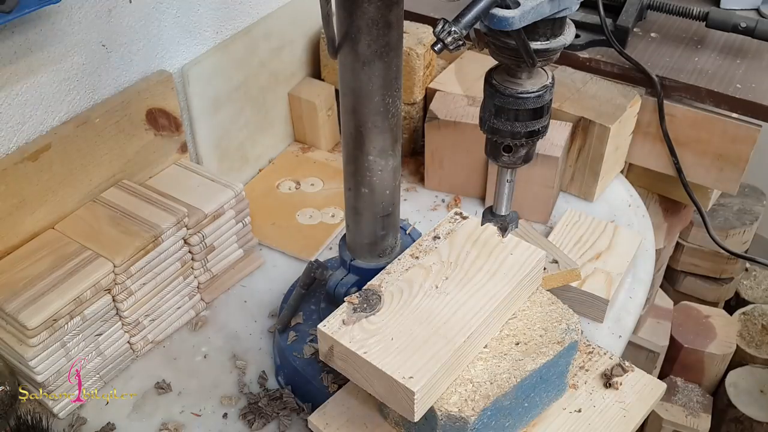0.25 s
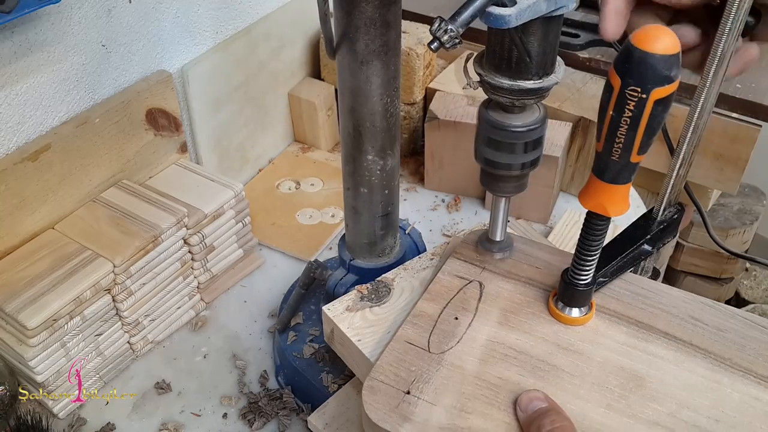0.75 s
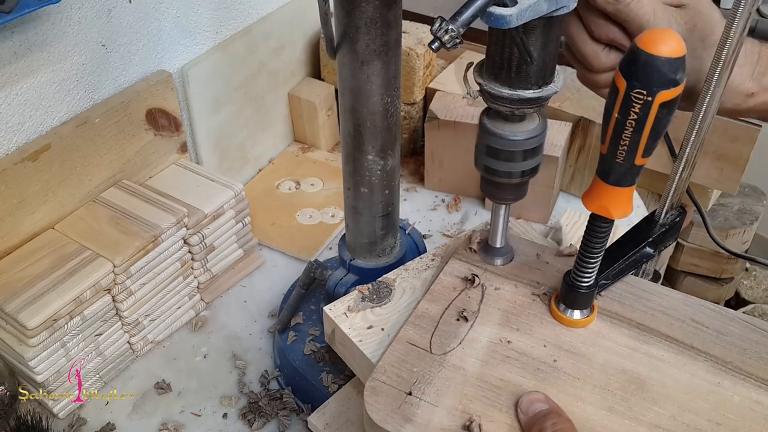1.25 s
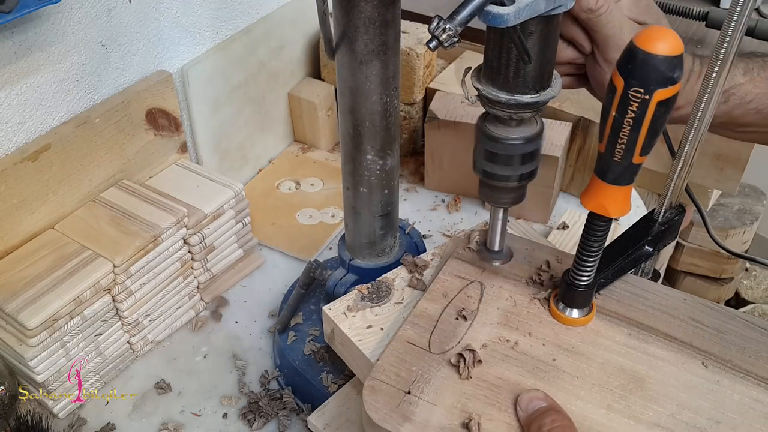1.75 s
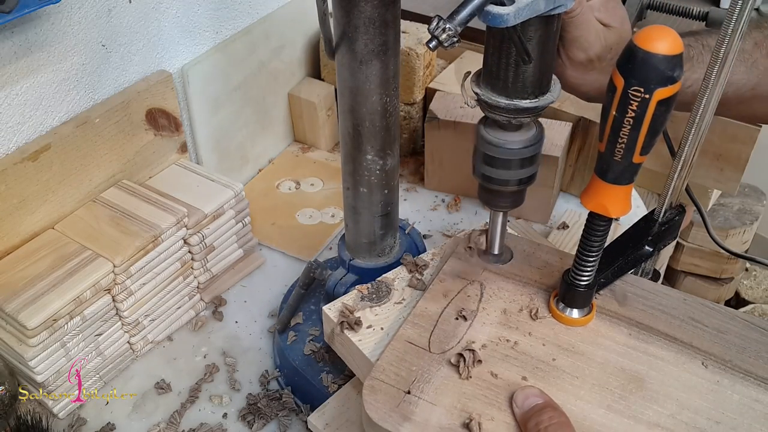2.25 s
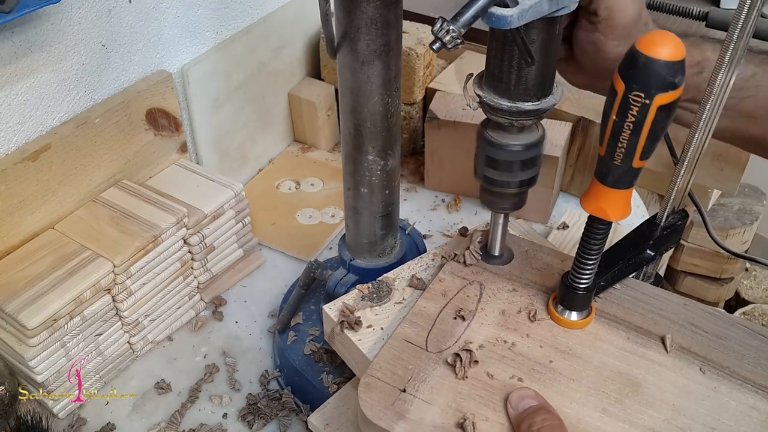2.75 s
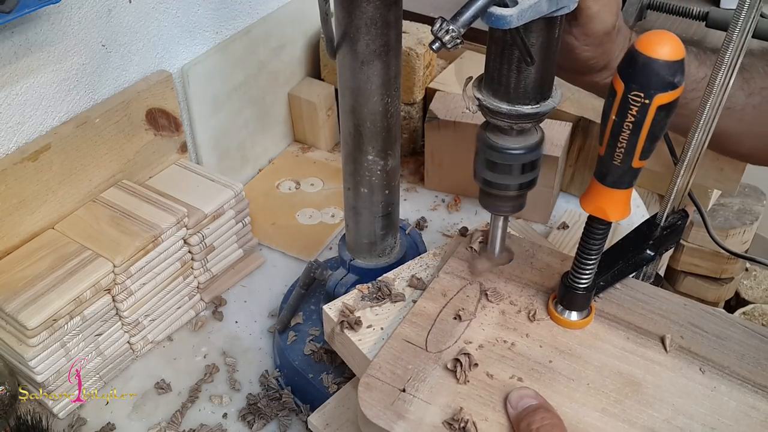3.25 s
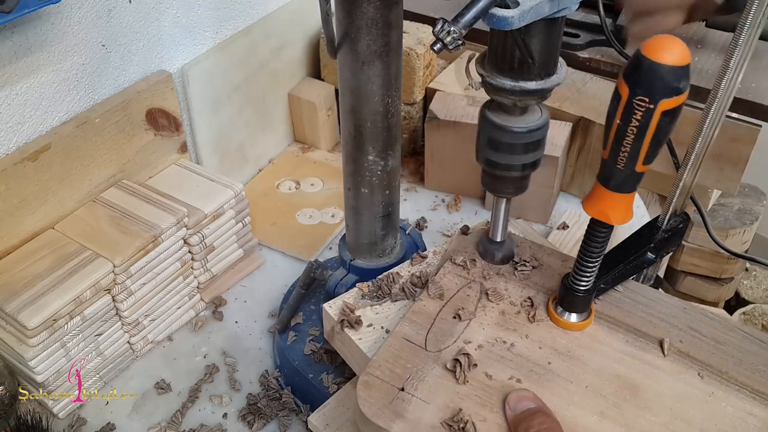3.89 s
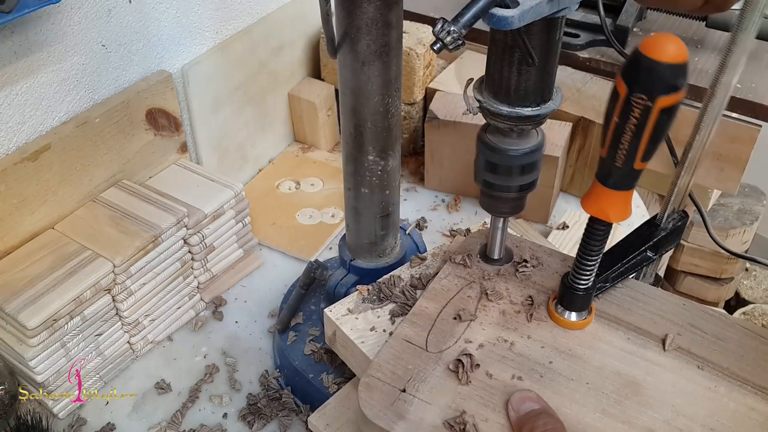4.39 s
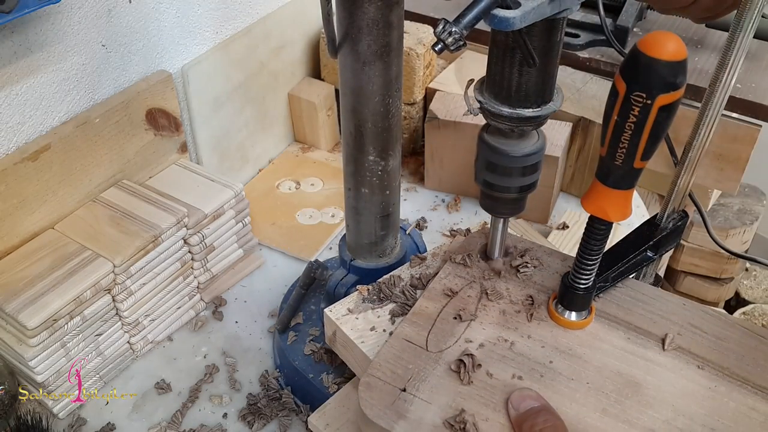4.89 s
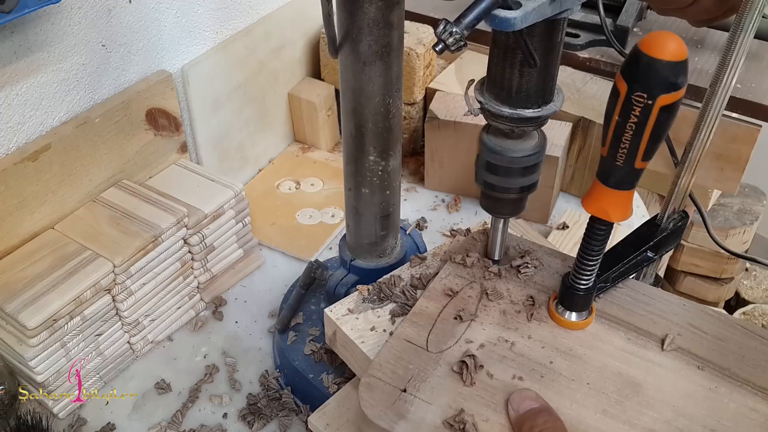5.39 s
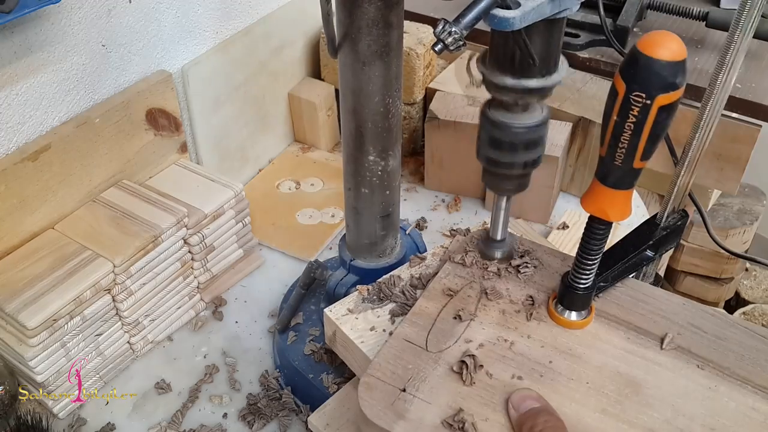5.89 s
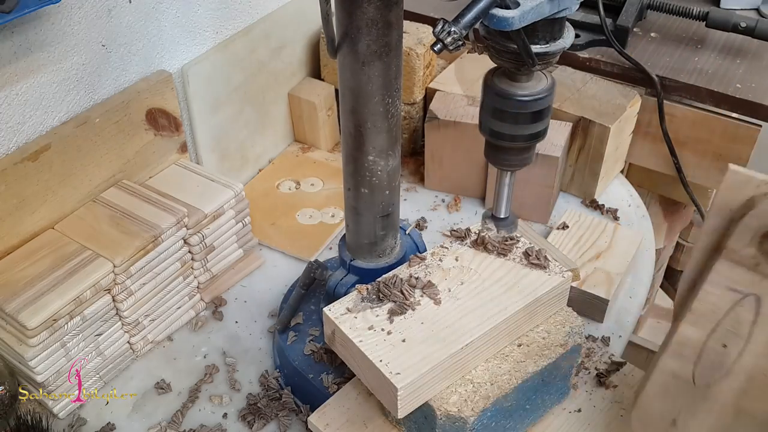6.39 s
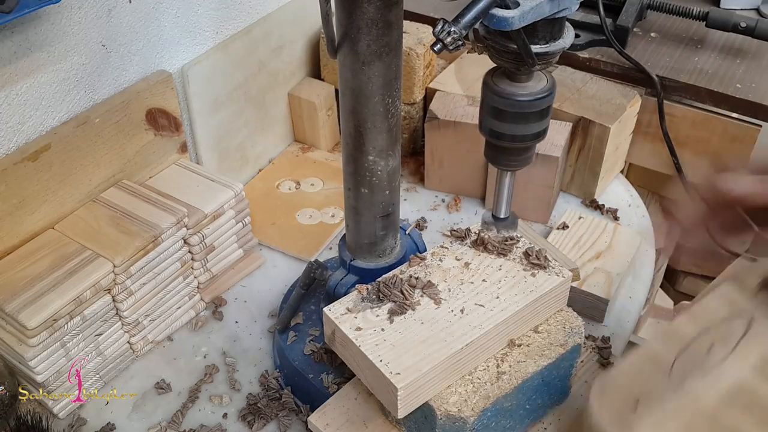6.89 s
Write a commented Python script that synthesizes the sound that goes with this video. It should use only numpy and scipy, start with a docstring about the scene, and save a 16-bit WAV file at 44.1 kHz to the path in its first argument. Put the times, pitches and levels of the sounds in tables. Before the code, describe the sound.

Faint brushes of wood on wood open the scene in a small, quiet workshop. At about 0.7 seconds a bench drill press starts abruptly, its whirr, motor hum and thin bearing whine continuing close by throughout. From 1 to 2.5 seconds the bit bores into a hardwood board with a fast, fluttering rasp, hissing chips and brief high squeals. It rubs and squeaks in the hole, then cuts again from 2.8 to 3.8 seconds, squealing a few more times. Around 4 seconds it scrapes and snags in several sharp catches. A third, deeper plunge runs from 4.4 to 5.9 seconds with a rougher judder, ending in tiny squeaks and a rub. From 6 seconds shavings tick onto the table, and the board slides off with a short scrape near 6.4 seconds. The idling spindle knocks lightly and unevenly until the end, just after 7 seconds.

```python
"""A bench drill press bores a hardwood board in three plunges with a two-lipped bit, in a small workshop.
After faint handling the machine cuts in: bearings whirr through the cast frame and whine, the motor
hums, the idling spindle knocks. Each lip rasps across the grain once a turn, tearing chips, jolting the
board and ringing the bit, at times to a squeal. Between plunges the bit rubs, catches and squeaks in
the hole. At the end the board is slid off and shavings scatter."""
import sys
import numpy as np
from scipy import signal
from scipy.fft import rfft, irfft, next_fast_len
from scipy.io import wavfile
from scipy.ndimage import uniform_filter1d

SR = 44100
rng = np.random.default_rng(int(sys.argv[2]) if len(sys.argv) > 2 else 0)


def generate_wav(signal):
    """Clip the signal to [-1, 1] and save it as 16-bit WAV at the path in sys.argv[1]."""
    frames = np.transpose(np.atleast_2d(signal))
    scaled = np.clip(frames, -1, 1) * 32767
    pcm = np.round(scaled).astype(np.int16)
    wavfile.write(sys.argv[1], SR, pcm)


N = 314874
T = np.arange(N) / SR
FFT_SIZE = next_fast_len(N + SR // 2)
HZ = np.fft.rfftfreq(FFT_SIZE, 1 / SR)

MOTOR_ON_S, FREE_TURNS_PER_S = 0.7122, 41.5
JOLT_LAG_RAD = 1.15  # spindle angle from a lip's bite to the board's jolt
FREE, BORING, DEEP = 0, 1, 2  # press state: running free, boring, deep in the hole

# Levels are relative within each table.
# wood slid on the table: (time [s], length [s], level [dB], brightness [0-1])
SLIDES = [(0.104, .03, -68.5, 0.3), (0.234, 0.014, -64.5, 0.77), (0.27, .014, -71, 0.3),
          (0.33, 0.095, -71.5, 0.1), (0.439, 0.0084, -60, 0.95), (0.46, 0.021, -61, 0.93),
          (0.508, 0.11, -74, 0.3), (6.406, 0.063, -36.5, 0.88)]
# spectrum of a sliding edge: (frequency [Hz], level [dB])
EDGE_SPECTRUM = [(200, -46), (400, -9), (800, -24), (2000, -10), (6000, -1), (12200, -8), (15500, -3.5)]
# still room: (frequency [Hz], level [dB])
ROOM_SPECTRUM = [(15, -20), (25, 4), (35, -25), (55, -40), (99, -46), (368, -11), (722, -21), (804, -9),
                 (1300, -21), (1800, -18), (2060, -20), (12500, -28), (15500, -40)]
# resonances of frame, table, board and bit:
# (frequency [Hz], width [Hz], free lift [dB], boring lift [dB], deep lift [dB])
PRESS_MODES = [(396, 50, 3.5, 8, -5.5), (538, 69, 8, 7, 7.5), (625, 35, 15.5, 5.5, -2),
               (734.4, 41, 10.5, 5.5, 7), (829, 85, 15, 1.5, 5), (1030, 33, 5.5, 4, 1.5),
               (1237, 40, 7, -3.5, 5.5), (1442.4, 71.5, 17, 13, 9.5), (1537, 85, 13, 4.5, 8.5),
               (1707.4, 101, 18, 10.5, 12), (1790.6, 38, 15.5, 14, 14), (1887, 50, -0.5, -6, -4),
               (1900, 43, 1.5, 5.5, 2.5), (1987, 85, 10, 7, 7.5), (2156, 130, 0, 6.5, 9.5),
               (2280, 93, 5, 10, 10), (2492, 58, 8, 11.5, 9), (2600, 35, 8, 4, 9.5),
               (2722, 140, 2.5, 12, 13), (2960, 41, 4.5, -1.5, 11.5), (3025, 190, -2.5, 1.5, -8.5),
               (3460, 320, -5.5, 1.5, 3.5), (3630, 73, 9.5, 7, 5.5), (3680, 41, 8.5, 7, 2.5),
               (4134, 116, 11, 7.5, 13.5), (4280, 17, 12.5, 4, 11), (4415, 106, 10, 14, 15.5),
               (5100, 370, -5, 2.5, 1.5), (5640, 260, 11.5, 4.5, 6.5), (6750, 270, 10, 7, 1.5),
               (7500, 250, 6, 1.5, -3), (9000, 190, -8, 8.5, 1.5), (11200, 750, -8, 4, 3)]
# force exciting them: (frequency [Hz], free level [dB], boring level [dB], deep level [dB])
FORCE_SPECTRUM = [(29.6, -10, -17.5, -19), (128, -31.5, -18.5, -26), (206, -13, -17, -19.5),
                  (465, -9.5, -19.5, -17.5), (1180, -3, -3.5, -8), (1600, -5, 1, -1.5),
                  (2370, 2, -6.5, -5.5), (3090, 2, -2, -1), (4340, -0.5, 0, -5.5), (4660, -4, 3.5, 2.5),
                  (7900, -12, 5.5, 3), (10350, -1.5, 6.5, 2.5), (12100, -7, 8, -1), (15600, -7.5, 6.5, 4.5)]
# motor tones: (low [Hz], middle [Hz], high [Hz])
HUM_HZ = (400, 732, 832)
# their swell and fade: (time [s], low tone [dB], middle tone [dB], high tone [dB])
HUM_LEVELS = [(.75, -58.5, -65, -56), (1.3, -68, -62, -61), (1.95, -67, -57, -55), (2.3, -67, -60, -61),
              (2.65, -63, -54, -53), (3.35, -66, -62, -62), (3.95, -71, -49, -48), (4.25, -73, -57, -53),
              (4.45, -74, -57, -50), (4.8, -78, -55, -56), (5.15, -78, -48, -50), (5.6, -76, -55, -58),
              (6.05, -65, -55, -53), (6.4, -63.5, -60, -58), (7.1, -65, -64, -58)]
# bearing tones: (frequency [Hz], start level [dB], midway level [dB], end level [dB])
WHINE_LINES = [(1696, -55, -52, -49), (1997, -53, -55, -56), (2326, -58, -58, -58), (2550, -60, -58, -56),
               (2585, -50, -46.5, -43), (2842, -61, -59, -58), (3358, -47, -53, -54), (3382, -60, -61, -61),
               (3694, -56, -56, -58), (3880, -64, -62, -59), (4140, -48, -43, -44), (7370, -72, -65, -61)]
# spindle knocks: (time [s], frame ring [dB], steel tick [dB])
KNOCKS = [(0.829, -25, -38), (2.567, -25, -51), (2.635, -29, -41), (6.165, -30, -45), (6.2187, -35, -46),
          (6.2594, -35, -48), (6.3116, -29, -44), (6.3338, -29.5, -39), (6.408, -35, -40),
          (6.5665, -36, -42), (6.6004, -35, -34), (6.6387, -34, -50), (6.74, -31, -44), (6.7845, -32, -40),
          (6.8396, -27, -48), (6.8714, -35.5, -45), (6.948, -29.5, -42), (7.016, -30, -49),
          (7.0714, -36, -42)]
# bit fed into the board: (start [s], end [s], feed-in [s], spindle slowing [turns/s], board level [dB],
# board drift [dB/s], chip hiss [dB], bit ring [dB], ring end [s])
PLUNGES = [(0.973, 2.52, 0.022, 2.43, -28, -1, -29, -35.5, 2.45),
           (2.775, 3.836, 0.062, 1.86, -29.5, -1.5, -29, -38.5, 3.59),
           (4.439, 5.898, 0.09, 0.912, -28, 0.5, -30.5, -43, 5.8)]
# one lip takes over in the deep hole: (time [s], imbalance [0-1])
LIP_IMBALANCE = [(4.8, .05), (5.3, .35)]
# passing resonances of the cut: (peak time [s], length [s], frequency [Hz], width [Hz], lift [dB])
CUT_SWELLS = [(1.146, 0.27, 1520, 150, 4), (1.142, 0.26, 2110, 500, 5), (1.5, 3, 6960, 600, 1.5),
              (1.496, 1.3, 12000, 800, 0.5), (1.86, 0.37, 1776, 80, 11.5), (3.3, 1, 10000, 1100, 5.5),
              (3.3, 1.2, 1470, 160, -2), (4.656, .6, 10000, 1400, 6), (4.755, 0.84, 2560, 250, 8.5),
              (5.35, 1.23, 9100, 1700, 2.5), (5.45, 0.59, 2270, 260, 4.5), (5.447, 0.83, 2920, 171, 7.5),
              (5.503, 0.99, 3580, 149, 9.5), (5.6, 1.2, 1270, 150, 9.5)]
# a lip snags the hole wall: (time [s], length [s], level [dB])
CATCHES = [(.976, .003, -29.5), (2.635, .004, -37), (2.731, .008, -27.5), (3.875, .035, -39),
           (3.949, .008, -28.5), (3.963, .012, -28), (4.022, .013, -27.5), (4.115, .01, -26.5),
           (4.199, .005, -31), (4.209, .024, -25), (4.236, .018, -36), (4.388, .008, -36),
           (5.972, .019, -32), (6.012, .02, -40)]
# bit squeals: (peak time [s], length [s], level [dB])
SQUEALS = [(1.016, 0.015, -31), (1.24, .05, -35.5), (1.448, 0.057, -36), (1.514, 0.052, -33),
           (1.607, 0.081, -30), (1.687, 0.049, -31.5), (2.094, 0.038, -29), (2.192, 0.1, -32.5),
           (2.264, 0.056, -40), (2.378, 0.12, -32), (2.903, 0.1, -30.5), (3.04, 0.055, -34),
           (3.105, .04, -44), (3.193, .06, -33), (3.35, 0.037, -38)]
# rim rubs while lifted: (start [s], end [s], level [dB])
RUBS = [(2.48, 2.76, -39), (3.799, 4.33, -40), (4.297, 4.464, -35.5), (5.862, 6.061, -37.5)]
# rubbed board: (frequency [Hz], level [dB])
RUB_SPECTRUM = [(59, -27), (100, -29.5), (447, -17.5), (627, -3.5), (1160, -7), (1450, 6), (1730, 2),
                (2000, -3.5), (2630, 1.5), (3050, -12), (4280, -2), (4860, -6.5), (5750, -6.5),
                (15500, -19)]
# dry steel on wood: (time [s], frequency [Hz], length [s], level [dB])
SQUEAKS = [(2.502, 11200, .007, -33), (2.75, 11400, .006, -22.5), (2.751, 7700, .004, -35),
           (2.757, 11600, .014, -35), (2.774, 11600, .005, -30), (4.421, 10100, .008, -27),
           (4.424, 9000, .016, -35), (4.434, 10200, .014, -36), (5.838, 8800, .0032, -28),
           (5.863, 8800, .0037, -26)]
# shavings land: (time [s], frequency [Hz], level [dB])
SHAVINGS = [(6.067, 10800, -42), (6.118, 10830, -44), (6.151, 6100, -39), (6.165, 11000, -43),
            (6.222, 5500, -54), (6.321, 7000, -44), (6.404, 11000, -50), (6.42, 6200, -44),
            (6.6, 6940, -43), (6.693, 10000, -40.5), (6.824, 9400, -42), (7.012, 9500, -41),
            (7.13, 10400, -42)]
# stereo width by default, boring and deep in the hole: (frequency [Hz], side minus mid [dB])
BASE_WIDTH = [(60, -11), (99, -17), (160, -7), (270, -33), (450, -14), (740, -18), (1220, -8), (1600, -23),
              (2010, -1), (3330, -7.5), (5500, 0.5), (9080, -12.5), (15000, -12)]
BORING_WIDTH = [(60, 1), (99, -11), (160, -1), (270, -3), (450, -7), (740, -20), (1200, -9.5),
                (1500, -18.5), (1780, -19), (2100, -8.5), (3330, -2.5), (4350, -5.5), (5500, -0.5),
                (9080, -8), (15000, -2.5)]
DEEP_WIDTH = [(60, 16), (99, -17), (160, -1), (270, -11), (450, -7), (740, -31), (1250, -10.5), (1650, -22),
              (2010, -5.5), (3330, -3), (5500, 2), (9080, -14), (15000, -16)]
# stereo balance: (frequency [Hz], left minus right [dB])
BALANCE = [(60, 1), (99, -3), (160, 2.5), (270, -1.5), (450, 1.5), (740, 1), (1220, 1), (2010, -1.5),
           (3330, 0.5), (5500, -0.5), (9080, -0.5), (15000, -0.5)]


def amp(db):
    """Decibels to gain."""
    return 10 ** (np.asarray(db) / 20)


def unit_rms(x):
    """Divide by the root of the mean square: rms 1 for real x."""
    return x / np.sqrt(np.mean(x ** 2) + 1e-20)


def curve(points):
    """(Hz, value) points joined on a log frequency axis."""
    hz, value = np.transpose(points)
    return np.interp(np.log(HZ + 1), np.log(hz + 1), value)


def bell(hz, width_hz):
    """Power curve of one resonance."""
    return 1 / (1 + (2 * (HZ - hz) / width_hz) ** 2)


def gate(start_s, end_s, rise_s, fall_s):
    """Trapezoid envelope, zero at start and end."""
    return np.clip(np.minimum((T - start_s) / rise_s, (end_s - T) / fall_s), 0, 1)


def burst(start_s, length_s, rise_s, fall_s):
    """Linear rise, hold, exponential fall."""
    return np.clip((T - start_s) / rise_s, 0, 1) * np.exp(-np.clip((T - start_s - length_s) / fall_s, 0, 20))


def wobble(rate_hz):
    """Smooth random curve, rms near 1."""
    knots = signal.resample_poly(rng.standard_normal(int(N * rate_hz / SR) + 4), 4, 1)
    return np.interp(T * rate_hz, np.arange(len(knots)) / 4, knots)


def roughness(rate_hz, spread_db):
    """Random, bounded flutter of a contact force, rms 1."""
    return unit_rms(amp(spread_db * 2 * np.tanh(wobble(rate_hz) / 2)))


def turn_pulses(angle, depth_db, uneven_db):
    """Two unequal pulses a turn, skewed like a lip's quick bite and slow release; rms 1."""
    bite = np.cos(2 * angle) - 0.3 * np.sin(4 * angle)
    return unit_rms(amp(depth_db * bite + uneven_db * np.cos(angle)))


def filtered(x, response):
    """Apply a frequency response."""
    return irfft(rfft(x, FFT_SIZE) * response, FFT_SIZE)[..., :N]


def causal(gain_db):
    """Minimum-phase response: rings only after it is struck."""
    cepstrum = irfft(np.maximum(gain_db, -120) * np.log(10) / 20, FFT_SIZE)
    cepstrum[1:FFT_SIZE // 2] *= 2
    cepstrum[FFT_SIZE // 2 + 1:] = 0
    return np.exp(rfft(cepstrum))


def noise(envelope, response, width=BASE_WIDTH):
    """Enveloped stereo noise, coloured by a response."""
    spread = np.arctan(amp(curve(width)))
    drive = envelope * rng.standard_normal((2, N))
    mid, side = filtered(drive, unit_rms(response) * [np.cos(spread), np.sin(spread)])
    return np.array([mid + side, mid - side])


def room_tone():
    """Faint, near-steady noise of the still room."""
    return noise(amp(-79 + 0.3 * wobble(2.6)), amp(curve(ROOM_SPECTRUM)))


def handling():
    """Wood brushes wood: bright on an edge, dull when flat."""
    edge = flat = 0
    for s, length_s, db, brightness in SLIDES:
        stroke = amp(db) * burst(s, length_s, rise_s=length_s / 3, fall_s=0.013)
        edge += stroke * np.sqrt(brightness)
        flat += stroke * np.sqrt(1 - brightness)
    flat_db = curve([(150, -33), (400, 0), (1200, 0.5), (3000, -6), (15000, -8.5)]) + 7 * bell(1160, 160)
    return noise(edge, causal(curve(EDGE_SPECTRUM))) + noise(flat, causal(flat_db))


def spindle():
    """Angle [rad] and load [0-1]; each plunge drags the speed down."""
    lag_s = 0.14
    load = lost_turns_per_s = 0
    for start_s, end_s, _, slowing, *_ in PLUNGES:
        engaged = gate(start_s, end_s + lag_s / 2, lag_s, lag_s)
        load += engaged
        lost_turns_per_s += slowing * engaged
    return 2 * np.pi * np.cumsum(FREE_TURNS_PER_S - lost_turns_per_s) / SR, load


def press_response(state):
    """Force spectrum lifted by the resonances of the press in one state."""
    force_db = curve([(hz, db[state]) for hz, *db in FORCE_SPECTRUM])
    modes_db = sum(db[state] * bell(hz, width_hz) for hz, width_hz, *db in PRESS_MODES)
    return causal(force_db + modes_db)


def whirr(angle, running):
    """Rattling bearings ring the cast frame."""
    rattle = roughness(560, spread_db=0.5) * turn_pulses(angle, depth_db=1, uneven_db=-1)
    return noise(amp(-42 + 0.7 * wobble(14)) * running * rattle, press_response(FREE))


def hum():
    """Three low motor tones swell and fade."""
    times_s, *levels_db = np.transpose(HUM_LEVELS)
    tones = sum(amp(np.interp(T, times_s, db)) * np.sin(2 * np.pi * hz * T + 0.15 * wobble(12))
                for hz, db in zip(HUM_HZ, levels_db))
    return np.sqrt(2) * tones


def whine(load):
    """Bearing tones swell on each belt lap, waver and sink under load; the high ones most."""
    laps_per_s, tight_s, midway_s = 3.8, 6.53, 4.4
    belt_pull = np.cos(2 * np.pi * laps_per_s * (T - tight_s))
    lines = np.zeros((2, N))
    for hz, *drift_db in WHINE_LINES:
        height = min(hz / 3000, 1)
        phase = 2 * np.pi * hz * T + height * (0.15 + 1.1 * load) * wobble(24)
        swell_db = 4.5 * min(hz / 4000, 1) ** 3 * belt_pull + 0.7 * wobble(7.8)
        level_db = np.interp(T, [MOTOR_ON_S, midway_s, T[-1]], drift_db) + swell_db - 11 * height * load
        stereo_rad = [[0], [min(hz / 2400, 1.5)]]
        lines += amp(level_db) * np.sin(phase + stereo_rad)
    return amp(3) * lines


def knocks():
    """The loose, unloaded spindle knocks in its splines: frame rings, steel ticks."""
    thump = sum(amp(db) * burst(s, 0.0012, rise_s=0.00056, fall_s=0.0064) for s, db, _ in KNOCKS)
    tick = sum(amp(db) * burst(s, 0.0011, rise_s=0.0015, fall_s=0.0041) for s, _, db in KNOCKS)
    impact_db = curve([(400, -10.5), (800, -1.5), (1700, -0.5), (3000, -11), (8000, -8)])
    frame = press_response(FREE) * causal(impact_db)
    steel = bell(5500, 320) + 0.27 * bell(7200, 300)
    return noise(amp(-10.5) * thump, frame) + noise(amp(1) * tick, steel)


def feed(plunge):
    """Board, hiss and ring envelopes of one plunge: build on feeding, die on lifting."""
    start_s, end_s, feed_in_s, _, board_db, drift_db_per_s, hiss_db, ring_db, ring_end_s = plunge
    lift_s = 0.073
    elapsed_s = np.clip(T - start_s, 0, end_s - start_s)
    board = gate(start_s, end_s, feed_in_s, lift_s) * amp(board_db + drift_db_per_s * elapsed_s)
    hiss = gate(start_s, end_s, 0.021, lift_s) * amp(hiss_db)
    ring = gate(start_s, ring_end_s, feed_in_s, lift_s) * amp(ring_db + 0.8 * wobble(11))
    return np.array([board, hiss, ring])


def chips(per_s=1800, low_hz=5000, high_hz=15500, fall_s=0.0007):
    """Chips snap off as tiny pings of random pitch and size; stereo, rms 1."""
    when, pitch, offset, side, size = rng.random((int(per_s * N / SR), 5)).T[:, :, None]
    t = T[:SR // 250]
    phase = 2 * np.pi * ((low_hz + pitch * (high_hz - low_hz)) * t + offset)
    decay = amp(-3.2 * np.log(size + 0.03)) * np.exp(-t / fall_s)
    samples = ((when * N).astype(int) + np.arange(len(t))).ravel()
    left_right = [decay * np.sin(phase + ear * np.pi * (side - 0.5)) for ear in (0.5, -0.5)]
    return unit_rms(np.array([np.bincount(samples, pings.ravel(), N)[:N] for pings in left_right]))


def bore(plunges, angle, response, width, board_db, hiss_db, ring_db, jolt_gain, imbalance, pan_db):
    """The lips tear hissing chips, jolt the board and ring the bit."""
    board, hiss, ring = sum(feed(plunge) for plunge in plunges)
    treble = 1 / (1 + (4200 / (HZ + 1)) ** 6)
    bit_mode = bell(4264, 280) ** 2
    board_band = response * np.sqrt((1 - treble) * (1 - bit_mode))
    chip_band = response * np.sqrt(treble * (1 - bit_mode))
    tearing = turn_pulses(angle, depth_db=2.3, uneven_db=-0.7) * roughness(1900, spread_db=3.4)
    snaps = chips() * turn_pulses(angle, depth_db=2.5, uneven_db=-0.7)
    # just after biting, each lip breaks through the end grain
    lagged = angle - JOLT_LAG_RAD
    breakthrough = np.exp(1.8 * (np.cos(2 * lagged) - 1))
    jolt = 1 + jolt_gain * (1 + imbalance * np.cos(lagged)) * breakthrough
    thrust = unit_rms(jolt) * roughness(1100, spread_db=0.8) * amp(0.3 * wobble(22))
    chatter = turn_pulses(lagged, depth_db=2.2, uneven_db=0.5) * amp(0.39 * wobble(25.5))
    cut = (noise(amp(board_db) * board * thrust, board_band, width)
           + noise(amp(hiss_db) * hiss * tearing, chip_band, width)
           + filtered(amp(hiss_db - 2.5) * hiss * snaps, unit_rms(chip_band))
           + noise(amp(ring_db) * ring * chatter, response * np.sqrt(bit_mode), width))
    return cut * amp([[pan_db / 2], [-pan_db / 2]])


def depth_and_grain(cut):
    """The cut's colour shifts with depth, and at random with the grain."""
    hz, t, spectra = signal.stft(cut, SR, nperseg=1024)
    lift_db = 0
    for s, length_s, centre_hz, width_hz, db in CUT_SWELLS:
        swell = np.exp(-(2 * (t - s) / length_s) ** 2)
        lift_db += db * swell / (1 + (2 * (hz[:, None] - centre_hz) / width_hz) ** 2)
    grain = rng.standard_normal(spectra.shape[1:])
    grain = uniform_filter1d(uniform_filter1d(grain, size=6, axis=0), size=7, axis=1)
    _, coloured = signal.istft(spectra * amp(lift_db + 1.6 * unit_rms(grain)), SR, nperseg=1024)
    return coloured[:, :N]


def catches(response):
    """A lip snags and splinters the wall; the board thuds on."""
    bite = sum(amp(db) * burst(s, length_s, rise_s=0.001, fall_s=0.003) for s, length_s, db in CATCHES)
    thud = sum(amp(db) * burst(s, length_s, rise_s=0.001, fall_s=0.009) for s, length_s, db in CATCHES)
    splinter_band = response * amp(4 * bell(1000, 1100) + 4 * bell(5500, 2500))
    thud_band = response * causal(curve([(150, 0), (400, 4), (2700, 0), (5000, -14)]))
    splinter = noise(amp(0.3) * bite * roughness(1500, spread_db=1), splinter_band, DEEP_WIDTH)
    return splinter + noise(amp(-3.5) * thud, thud_band)


def squeal(angle, hz=4396):
    """The bit briefly locks onto its own note, shaken by each lip."""
    swell = sum(amp(db) * np.exp(-2 * (1.4 * (T - s) / length_s) ** 2) for s, length_s, db in SQUEALS)
    tone = np.sqrt(2) * np.sin(2 * np.pi * hz * T + 0.7 * wobble(130))
    return amp(-0.6) * swell * turn_pulses(angle - JOLT_LAG_RAD, depth_db=4, uneven_db=1.5) * tone


def rubbing(angle):
    """The rim scrapes round the hole; the board answers hollowly."""
    pressure = sum(amp(db) * gate(start_s, end_s, rise_s=0.031, fall_s=0.038)
                   for start_s, end_s, db in RUBS)
    scrape = turn_pulses(angle, depth_db=1, uneven_db=3) * roughness(950, spread_db=-2.5)
    hollow_db = curve(RUB_SPECTRUM) + 6 * bell(580, 200) + 6 * bell(1745, 93) + 4 * bell(1720, 120)
    return noise(pressure * scrape, causal(hollow_db))


def squeaks():
    """Steel sticks and slips on wood in short, high chirps."""
    chirps = 0
    for s, hz, length_s, db in SQUEAKS:
        envelope = amp(db) * burst(s, length_s / 2, rise_s=0.0023, fall_s=length_s / 2)
        chirps += envelope * np.sin(2 * np.pi * hz * T + 0.73 * wobble(1300))
    return amp(6.5) * chirps


def shavings(crumbs_start_s=5.3):
    """Fine crumbs fall from the spinning bit; flung shavings tick on the table."""
    ticks = 0
    for s, hz, db in SHAVINGS:
        impact = amp(db) * burst(s, 0.00086, rise_s=0.0005, fall_s=0.0033) * rng.standard_normal(N)
        ticks += filtered(impact, unit_rms(bell(hz, 5200) ** 2))
    crumbs = amp(-56) * np.clip((T - crumbs_start_s) / 0.061, 0, 1) * roughness(83, spread_db=4.5)
    crumb_db = curve([(1000, -26), (4000, 17), (7500, 11), (11000, 6.5), (15500, -17)])
    return amp(6) * ticks + noise(crumbs, causal(crumb_db))


def dragging():
    """The board judders off the backing block with a low, hollow scrape."""
    pull = amp(-56.5) * gate(5.98, 6.54, rise_s=0.04, fall_s=0.067) * roughness(63, spread_db=-4)
    return noise(pull, bell(418, 160) ** 2)


def reflections(x, rt60_s=0.031, echo_db=-9):
    """Early echoes off table, column and wall ripple the treble."""
    t = T[:SR // 8]
    tail = rng.standard_normal(len(t)) * amp(-60 * t / rt60_s) * (t > 0.001)
    treble = 1 / (1 + (4500 / (HZ + 1)) ** 4)
    return filtered(x, 1 + amp(echo_db) * treble * rfft(tail / np.linalg.norm(tail), FFT_SIZE))


def scene():
    """The spindle's turning pulses the whirr, cutting, rubbing and squeal; the last plunge goes deep."""
    angle, load = spindle()
    running = np.clip((T - MOTOR_ON_S) / 0.0008, 0, 1)
    machine = whirr(angle, running) + running * (hum() + whine(load))
    shallow, deep = press_response(BORING), press_response(DEEP)
    shallow_cuts = bore(PLUNGES[:-1], angle, shallow, BORING_WIDTH, board_db=-2.5, hiss_db=-5.5,
                        ring_db=0.5, jolt_gain=0.4, imbalance=0.71, pan_db=0.5)
    deep_cut = bore(PLUNGES[-1:], angle, deep, DEEP_WIDTH, board_db=-4, hiss_db=-3, ring_db=3,
                    jolt_gain=1.65, imbalance=np.interp(T, *np.transpose(LIP_IMBALANCE)), pan_db=0)
    drilling = depth_and_grain(shallow_cuts + deep_cut) + rubbing(angle) + catches(deep)
    bench = shavings() + handling() + room_tone() + dragging()
    mix = machine + knocks() + reflections(drilling + bench) + squeal(angle) + squeaks()
    balance_db = curve(BALANCE)
    return filtered(mix, amp([balance_db / 2, -balance_db / 2]))


def record(dry):
    """Steep low-pass."""
    cutoff_hz = 15850
    return filtered(dry, 1 / (1 + (HZ / cutoff_hz) ** 300))


dry = scene()
out = record(dry)
generate_wav(out)
```